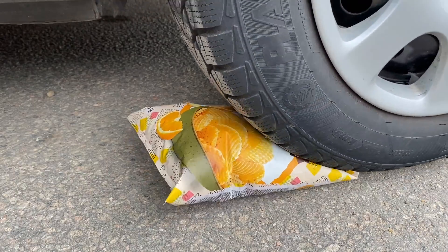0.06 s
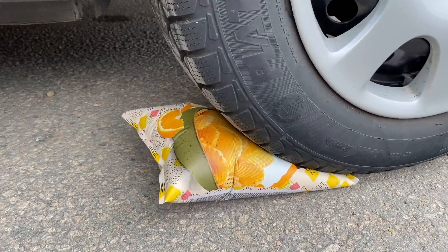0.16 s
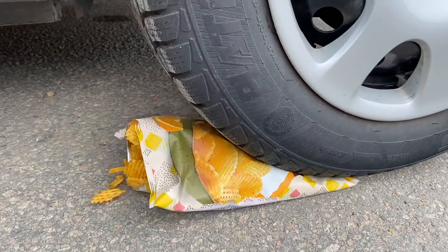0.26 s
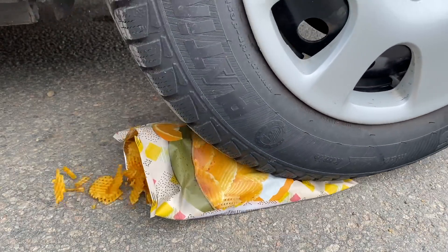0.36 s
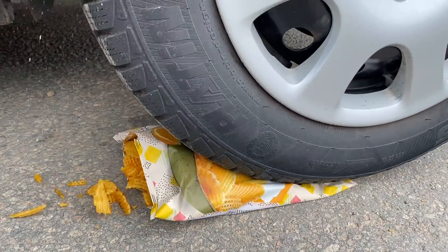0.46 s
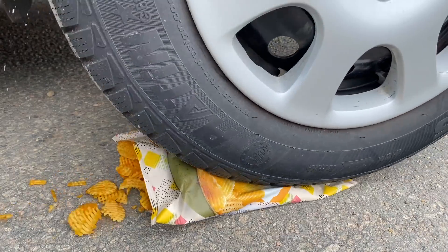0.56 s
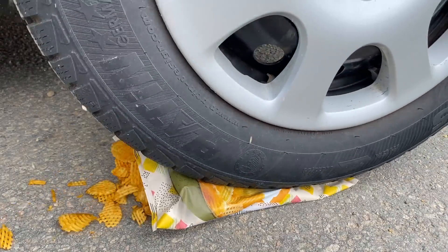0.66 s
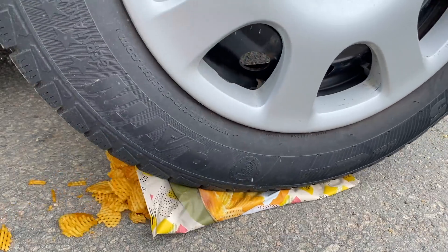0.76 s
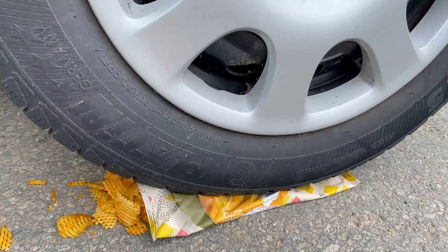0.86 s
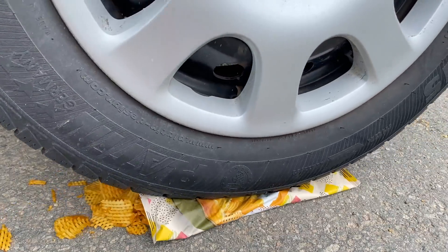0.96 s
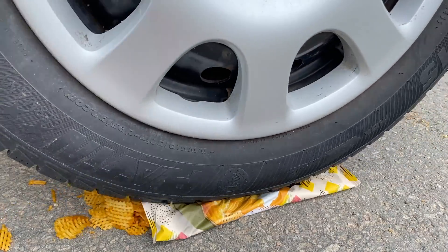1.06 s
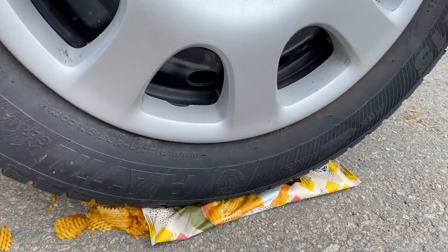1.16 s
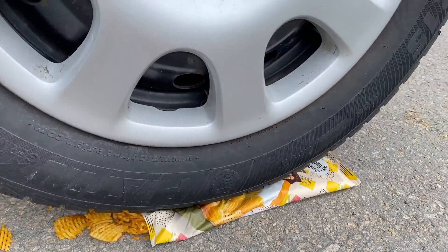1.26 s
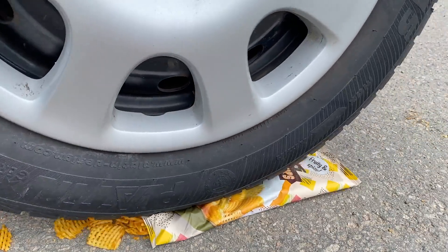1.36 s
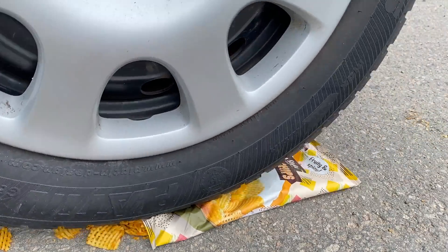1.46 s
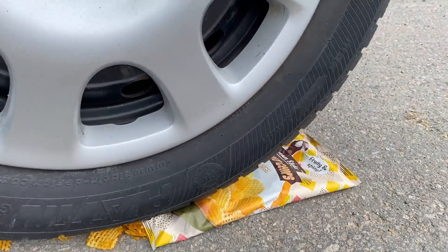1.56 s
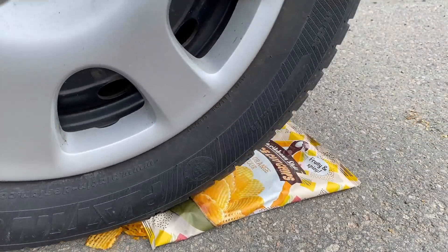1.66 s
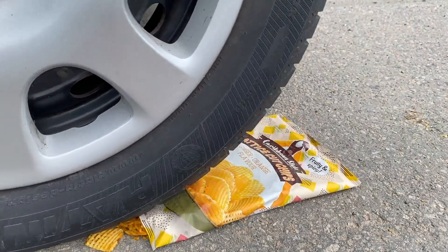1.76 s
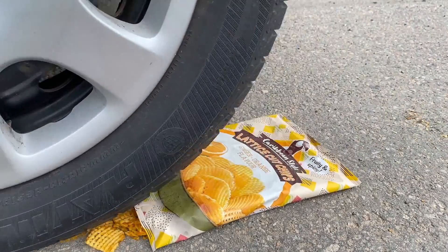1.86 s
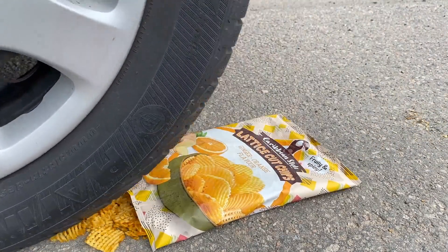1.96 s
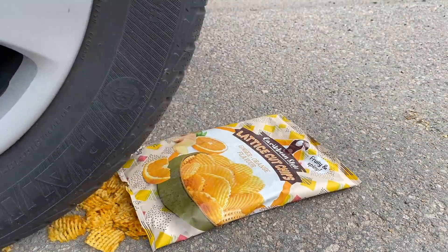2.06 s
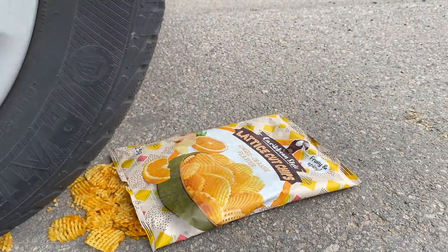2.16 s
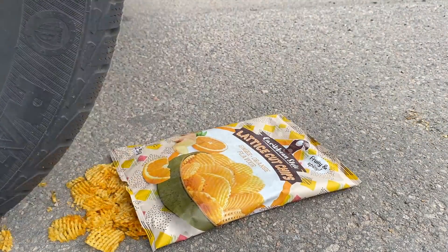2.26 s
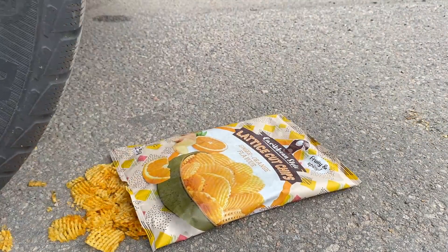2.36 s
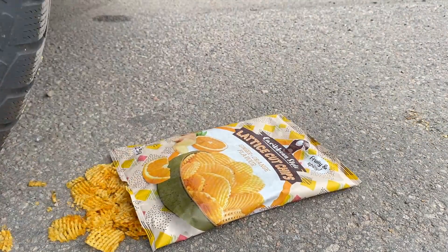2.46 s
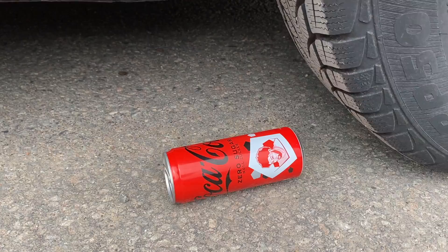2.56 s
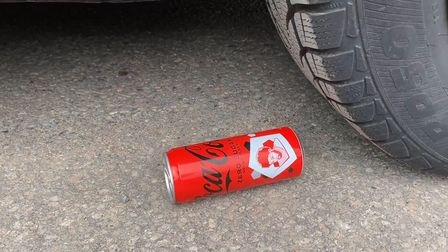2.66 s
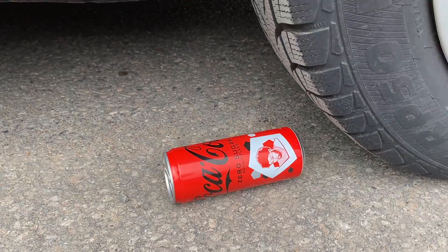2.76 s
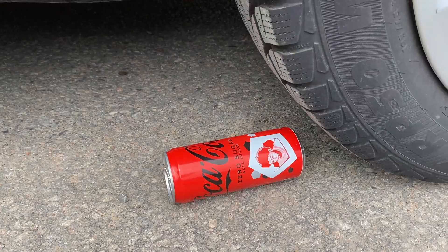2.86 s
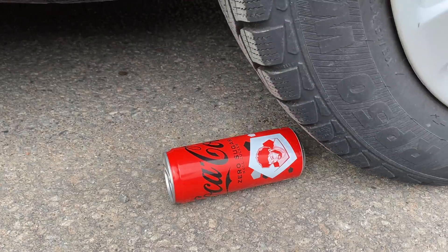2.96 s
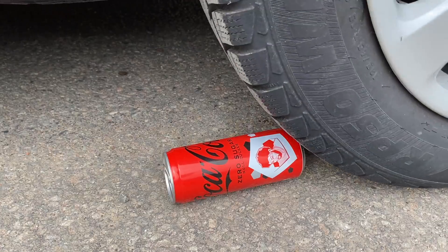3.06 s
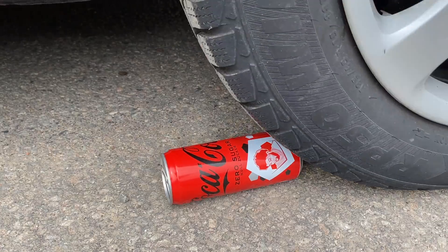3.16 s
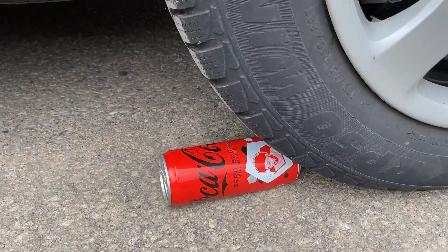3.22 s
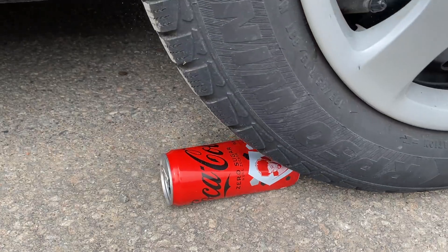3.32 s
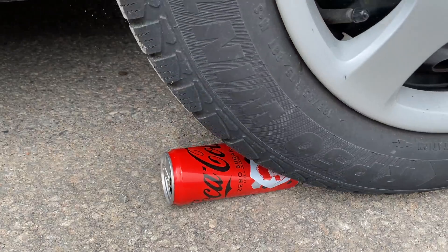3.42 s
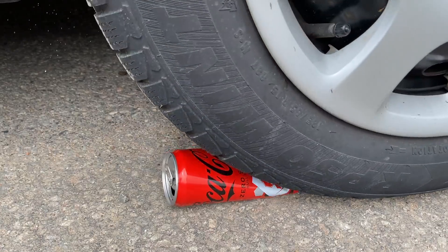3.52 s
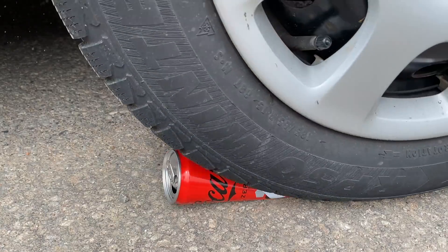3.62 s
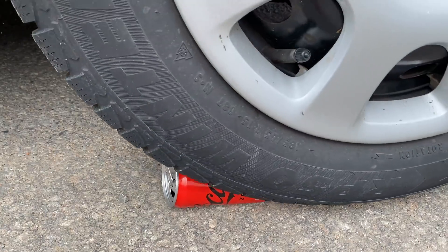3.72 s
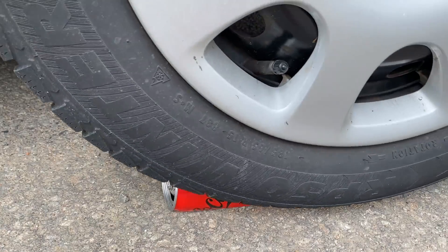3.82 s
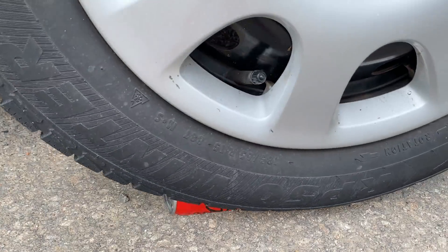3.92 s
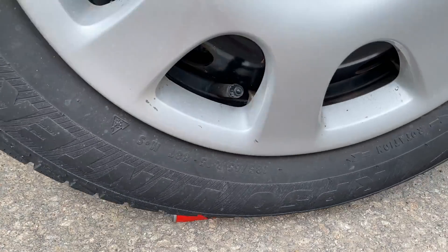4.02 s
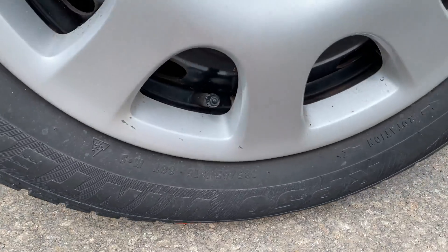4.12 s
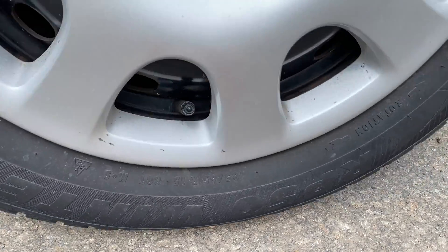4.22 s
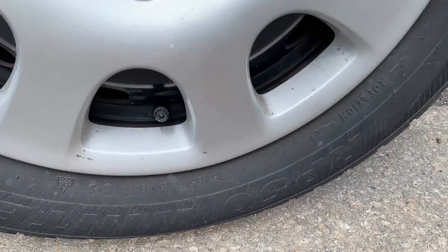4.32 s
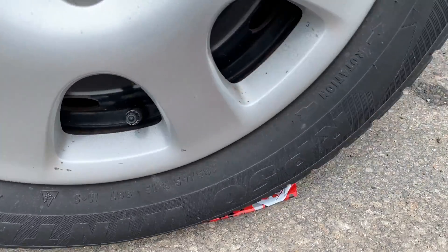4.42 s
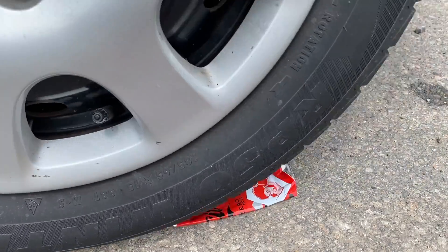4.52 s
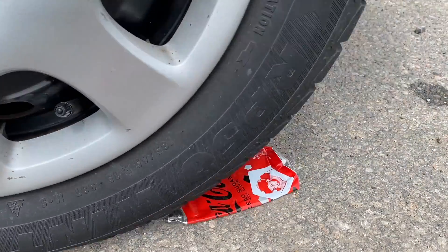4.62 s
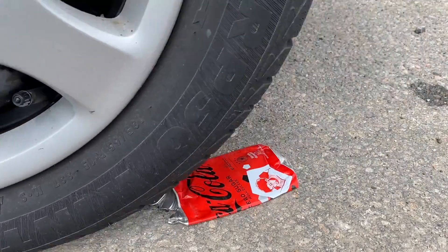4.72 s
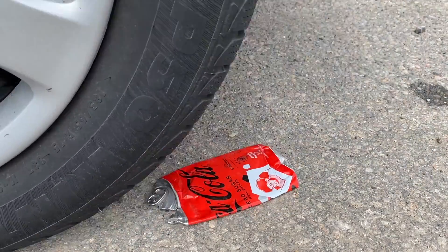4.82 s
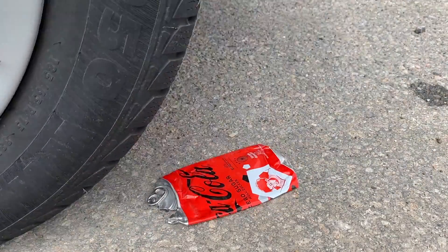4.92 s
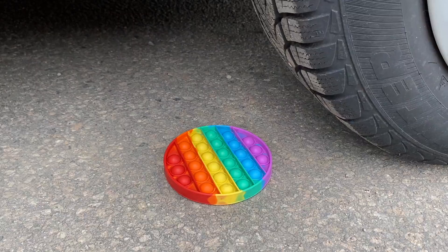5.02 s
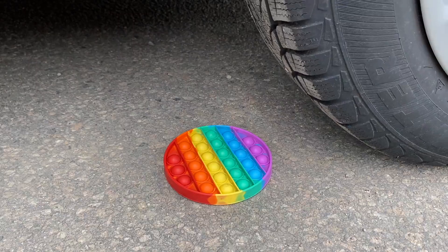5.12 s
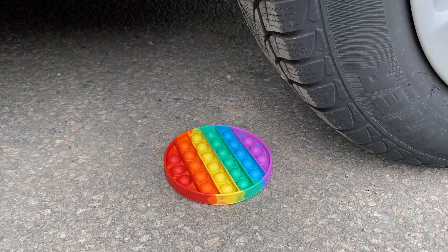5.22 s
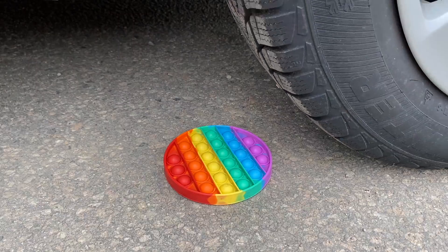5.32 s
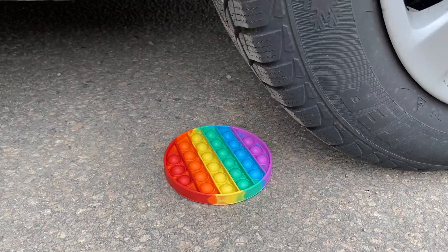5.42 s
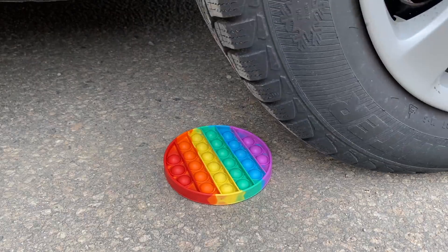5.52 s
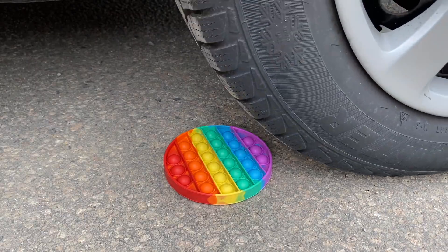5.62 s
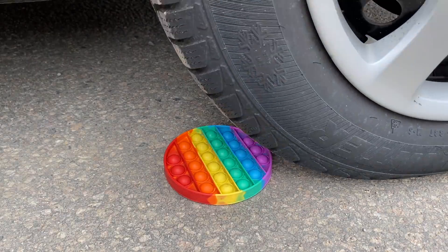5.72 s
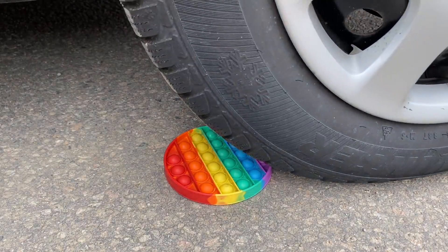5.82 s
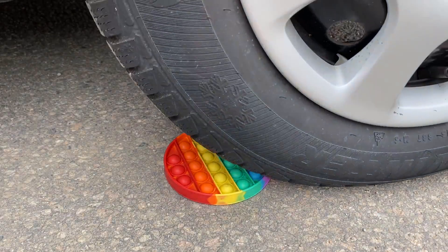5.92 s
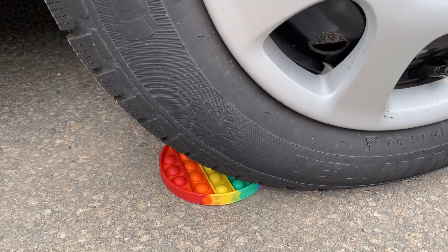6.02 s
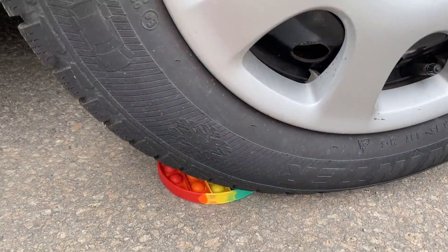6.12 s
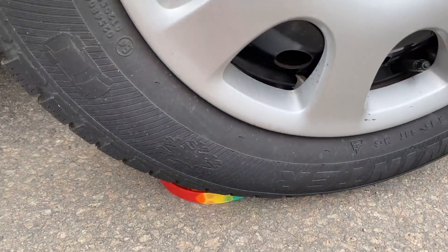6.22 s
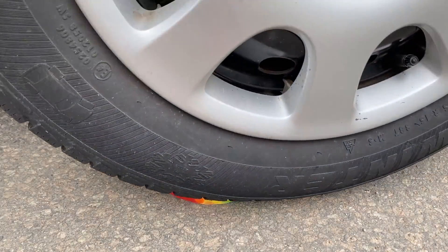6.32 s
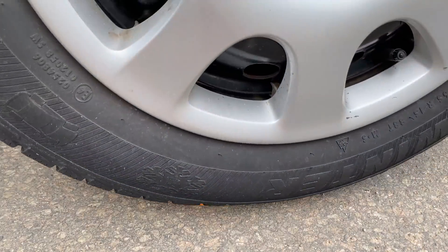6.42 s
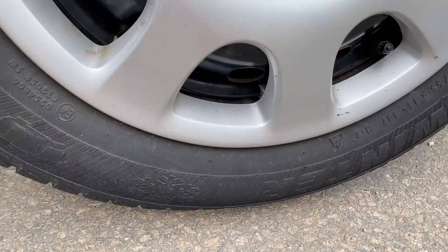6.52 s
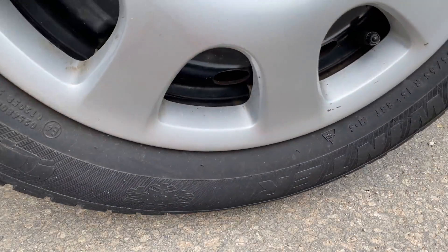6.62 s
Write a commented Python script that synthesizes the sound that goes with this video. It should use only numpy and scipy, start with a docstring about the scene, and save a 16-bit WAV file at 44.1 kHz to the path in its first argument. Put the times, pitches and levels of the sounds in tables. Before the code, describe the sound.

Close by an idling engine, brittle crunching ends in a sharp bag pop, thin metal crackles and buckles, then only quiet grit ticks remain.

```python
"""Crisps crunch and snap under a slowly rolling car tyre, and their bag bursts with a thump and a low puff.
Then the tyre buckles an empty drink can flat, and last it rolls onto a soft rubber toy with only ticks of grit.
The three shots are cut together. Breaks are short rings, noise and sharp cracks; the burst is a gliding tone.
Behind them an idling engine throbs in sine orders, with noise for its rumble, hiss and whines."""
import sys
import numpy as np
from scipy import signal
from scipy.fft import rfft, irfft, next_fast_len
from scipy.io import wavfile
from scipy.ndimage import uniform_filter1d, map_coordinates

SR = 44100
rng = np.random.default_rng(int(sys.argv[2]) if len(sys.argv) > 2 else 0)


def volts(x):
    """Linear amplitude factor 10**(x/20) for a level x in dB, scalar or array-like."""
    e = np.asarray(x, float) / 20
    return 10 ** e


def master(y):
    """Save y as 16-bit WAV."""
    cut = np.clip(np.atleast_2d(y).T, -1, 1)
    pcm = np.round(cut * 32767)  # scale
    wavfile.write(sys.argv[1], SR, pcm.astype(np.int16))


N = 294588  # length in samples


# steady crushing of crisps: (t/s, level/dB)
CRISP_CRUSH = [(0, -34.5), (.09, -21.5), (.19, -43), (.227, -31.5), (.231, -45), (.48, -24), (1.0, -24.5),
               (1.45, -31.5), (1.72, -30), (1.851, -36.5), (1.901, -53.5)]
# tone colour of dry crumbs: (f/Hz, relative level/dB)
CRUMB_COLOUR = [(150, -39.5), (300, -14.5), (650, -5.5), (1600, -7.5), (2200, -11), (4300, -12.5),
                (7500, -15.5), (16500, -25)]
# gain of the lower part of the crunch: (t/s, level/dB)
CRISP_BODY = [(0, 3.5), (1.6, 7), (1.87, -0.5)]
# single snaps of crisps: (t/s, level/dB, ring f/Hz, relative crack level/dB)
CRISP_SNAPS = [(.016, -16.5, 815, -12.5), (.029, -22, 1680, -10.5), (.038, -18, 1070, 2),
               (.054, -23, 970, -8), (.072, -16, 1538, -6.5), (.078, -10.5, 986, -7.5),
               (.099, -20, 1465, -14), (.108, -8, 1100, -8.5), (.114, -5, 635, -18),
               (.149, -13.5, 1570, -5), (.156, -10.5, 1040, -6), (.166, -13.5, 1040, -16),
               (.205, -10.5, 1192, -8), (.507, -11.5, 150, -24), (.61, -16.5, 1110, -8),
               (.813, -14.5, 1070, -8.5), (.989, -10, 1300, -12), (1.093, -16, 963, -7),
               (1.219, -18.5, 704, 17), (1.25, -11, 1085, 2), (1.751, -12, 890, -6), (1.848, -29, 870, 9),
               (1.861, -17.5, 2120, -12)]


def crisps():
    """Brittle pieces break in a dense crunch, with larger single snaps on top."""
    crunch = crushing(CRISP_CRUSH, CRUMB_COLOUR, rate=1100, spread_db=6, clump_db=0.14, cycles=0.61, bed=1.2)
    crunch = tilted(crunch, CRISP_BODY, split_hz=1300)
    return crunch + snaps(brittle(CRISP_SNAPS), CRUMB_COLOUR, [], rasp_db=-1.0, crack_db=-4.5)


def burst():
    """A falling thump as the seam tears; the flapping tone climbs, then slackens into a low puff."""
    tear_s, tighten_s, slack_s, sag_s = .2145, .006, .2258, .0033  # start, climb time, slackening, fall time
    flap_hz, tight_hz, puff_hz = 430, 928, 12
    flap_db, puff_rise_db, puff_t60_s, attack_s = -9, 3.5, .4, 0.0016
    thump_hz, thump_sag_s, thump_db, thump_t60_s = 483, .006, -3.5, .045  # start pitch, its fall, level, decay
    t = np.arange(N) / SR
    since = np.maximum(t - tear_s, 0)
    slack = np.maximum(t - slack_s, 0)
    onset = np.minimum(since / attack_s, 1)
    sag = np.exp(-slack / sag_s)
    climb = flap_hz * (tight_hz / flap_hz) ** np.minimum(since / tighten_s, 1)
    hz = puff_hz + (climb - puff_hz) * sag
    turn = 2 * np.pi * np.cumsum(hz * (since > 0)) / SR
    rough = 0.06 * (hz > 500) * rng.standard_normal(N)  # noise only while the pitch is high
    level_db = flap_db + puff_rise_db * (1 - sag) - 60 * slack / puff_t60_s
    flap = volts(level_db) * (np.sin(turn) + 0.045 * np.sin(3 * turn) + rough)
    thump_turn = 2 * np.pi * thump_hz * thump_sag_s * (1 - np.exp(-since / thump_sag_s))
    thump = volts(thump_db - 60 * since / thump_t60_s) * np.sin(thump_turn)
    return onset * (flap + thump)


# steady crushing of the can: (t/s, level/dB)
CAN_CRUSH = [(3.115, -43), (3.16, -34.5), (3.28, -28.5), (3.34, -60.5), (3.43, -34), (3.6, -19.5),
             (3.85, -22.5), (3.99, -25.5), (4.04, -26.5), (4.2, -27), (4.235, -40), (4.31, -15.5),
             (4.45, -30), (4.551, -50), (4.64, -34), (4.78, -63)]
# tone colour of thin sheet metal: (f/Hz, relative level/dB)
SHEET_COLOUR = [(120, -57.5), (250, 0.5), (550, 5.5), (1000, 4), (1500, 2.5), (4700, -5), (7500, -19),
                (16500, -31)]
# folds of the can wall: (t/s, level/dB, ring f/Hz, relative crack level/dB)
CAN_FOLDS = [(3.123, -18, 2163, -17), (3.144, -14.5, 2292, -6.5), (3.157, -9, 1388, 3),
             (3.166, -4, 372, -5), (3.176, -11.5, 3910, -0.5), (3.197, -11.5, 2443, 1.5),
             (3.225, -9, 669, 3.5), (3.251, -5.5, 2600, -0.5), (3.27, -6.5, 501.5, -1.5),
             (3.279, -12.5, 900, -25), (3.296, -16.5, 900, -30), (3.391, -36.5, 1880, 18),
             (3.414, -20, 1880, -9), (3.442, -4.5, 1092, -5.5), (3.464, -1.5, 1042, 6),
             (3.474, -2, 1014, 1), (3.523, -15.5, 1690, 11), (3.579, -1, 585, -4), (3.593, -11, 533, 2.5),
             (3.662, -6, 802, -15), (3.706, -3.5, 1995, 1.5), (3.716, -7.5, 900, -24), (3.747, 3.5, 847, 1),
             (3.761, -1.5, 719, -3.5), (3.797, 3, 1015, -4), (3.825, -0.5, 593, -11),
             (3.844, -8.5, 652, 8.5), (3.849, 0.5, 678, -25), (3.867, 4, 997, 0), (3.892, 3, 990, -3.5),
             (3.937, 3, 825, -6), (3.949, -6, 974, -22.5), (3.965, 5, 1934, -4), (3.998, -7, 1623, 0.5),
             (4.008, -4.5, 900, -7), (4.065, -2.5, 1500, -11), (4.122, -8, 1420, -5),
             (4.149, -15.5, 1600, 4.5), (4.164, 1.5, 1482, -19), (4.177, -4, 1662, 4),
             (4.241, 3, 1490, -21.5), (4.265, -6, 1386, -1), (4.284, -5, 1700, 2.5),
             (4.296, -14, 2680, -8.5), (4.302, -1, 1820, 1.5), (4.315, -5.5, 2900, -10),
             (4.328, -2, 1830, -7.5), (4.35, -0.5, 1980, -4.5), (4.372, -4, 1070, -23),
             (4.385, -8, 1910, -3.5), (4.401, -15, 1115, -12), (4.433, -8.5, 1003, -17.5),
             (4.468, -9.5, 1870, -12.5), (4.482, -3.5, 1498, -14.5), (4.578, -6.5, 1353, -2.5),
             (4.62, -22, 1370, -25), (4.649, -24.5, 1573, -17)]
# how long the wall rings at 1 kHz while the tread damps it: (t/s, t60/s)
WALL_RINGING = [(3.6, 0.084), (3.72, 0.049), (3.9, 0.047), (4.02, 0.022), (4.25, 0.011), (4.35, .02),
                (4.5, 0.057), (4.6, .07)]
# the can ringing as a whole, before chance changes: (f/Hz, relative level/dB, longest t60/s)
SHELL_MODES = [(386, -19, 0.081), (900, -20.5, 0.076), (1430, -20.5, 0.05), (1970, -7, 0.023)]
# gain of the can's low body, lost while it lies flat: (t/s, level/dB)
HOLLOW_BODY = [(3.99, 0), (4.04, -11), (4.235, -28), (4.55, -17.5), (4.63, -4)]


def can():
    """Folds of thin metal ring briefly, higher ones dying sooner; the flatter the can, the less low body."""
    rise_cycles = 1.145  # a fold gives way in about this many cycles of its ring
    pitch_damping = 0.41  # t60 falls as (Hz / 1000) to this power
    folds = []
    for s, db, hz, crack_db in CAN_FOLDS:
        t60 = np.interp(s, *np.transpose(WALL_RINGING)) * (hz / 1000) ** -pitch_damping
        folds.append((s, db, hz, crack_db, t60, rise_cycles / hz))
    metal = crushing(CAN_CRUSH, SHEET_COLOUR, rate=1000, spread_db=4.0, clump_db=4.5, cycles=3, bed=0.79)
    metal += snaps(folds, SHEET_COLOUR, SHELL_MODES, rasp_db=-3.5, crack_db=-1.0)
    return tilted(metal, HOLLOW_BODY, split_hz=786)


# ticks of grit: (t/s, level/dB, ring f/Hz, relative crack level/dB)
GRIT_TICKS = [(5.336, -33.5, 1250, 0), (5.622, -26, 1510, 4.5), (5.973, -28, 1040, -21),
              (6.234, -28.5, 1470, -27), (6.438, -31.5, 815, -18), (6.657, -27.5, 1000, -32),
              (6.667, -35.5, 1430, -15.5)]


def grit():
    """Small hard bits tick under the tyre like quiet, dry snaps."""
    return snaps(brittle(GRIT_TICKS), CRUMB_COLOUR, [], rasp_db=-7.5, crack_db=-11)


def brittle(rows):
    """Dry pieces all die equally fast: adds a t60 and a rise time in s to each row."""
    return [(*row, .014, .0008) for row in rows]


def crushing(rows, colour, rate, spread_db, clump_db, cycles, bed):
    """Dense small fractures, each a brief ring at its own pitch, clumped in time over a bed of finer ones."""
    t, life = np.arange(N) / SR, np.arange(160) / SR
    start, end = rows[0][0], rows[-1][0]
    on = (t >= start) & (t <= end)
    when, pitch, size, sign = rng.random((int(rate * (end - start)), 4)).T  # rate: fractures per second
    hz = 500 * 24 ** pitch[:, None]
    gain = volts(-spread_db * np.log(size * .98 + .02)) * np.sign(sign - .5)  # few large, many small
    decay = np.exp(-life * hz / cycles)
    ring = gain[:, None] * np.sqrt(hz) * np.sin(2 * np.pi * hz * life) * decay
    at = ((start + when * (end - start)) * SR).astype(int)[:, None] + np.arange(len(life))
    grains = np.bincount(at.ravel(), ring.ravel(), N)[:N]
    grains = filtered(grains, lambda f: np.sqrt(f))  # as many grains in each octave: level them per Hz
    fine_bed = bed * rng.standard_normal(N)
    mix = volts(clump_db * wobble(70)) * (grains / grains[on].std() + fine_bed)
    x = signal.fftconvolve(mix, causal(colour))[:N]
    return on * volts(curves(rows)[0]) * x / x[on].std()


def panel_ring(t, hz, t60, rise, body):
    """A quick run of slips sets off a strong panel tone, five weaker neighbours and the body modes."""
    swell = (t + 0.0006) / rise * np.exp(-t / rise)
    slips = (swell * rng.standard_normal(len(t)) * (rng.random(len(t)) < .15))[:1024]
    pitch = hz * np.exp(np.r_[0, rng.normal(.15, .5, 5)])[:, None]
    strength = volts(np.r_[0, rng.normal(-10, 3, 5)])[:, None]
    decay = volts(-60 * t / t60 * np.sqrt(pitch / hz))
    ring = np.sum(strength * np.sin(2 * np.pi * pitch * t) * decay, 0)
    for mode_hz, mode_db, mode_t60 in body:  # the dented shell is a little detuned at every fold
        bent_hz = mode_hz * rng.normal(1, 0.052)
        level_db = mode_db + rng.normal(0, 4.0) - 60 * t / min(mode_t60, 1.4 * t60)
        ring += volts(level_db) * np.sin(2 * np.pi * bent_hz * t)
    return signal.fftconvolve(ring, slips)[:len(t)]


def snaps(rows, colour, body, rasp_db, crack_db):
    """Each break adds up a ring set off by slips, a rasp of coloured noise and a bright crack."""
    out, t, shade = np.zeros(N + SR), np.arange(4096) / SR, causal(colour)[:256]

    def peak(v):
        """Scaled so that its loudest 70 samples have the rms of a sine of peak 1."""
        return v / np.sqrt(2 * abs(uniform_filter1d(v ** 2, size=70)).max())

    for s, db, hz, bright_db, t60, rise in rows:
        t60, rise = max(t60, .004), max(rise, .0002)
        ring = panel_ring(t, hz, t60, rise, body)
        fade = np.minimum(1, (t + 0.0012) / rise) * volts(-60 * np.maximum(t - rise, 0) / (0.92 * t60))
        rasp = signal.fftconvolve(rng.standard_normal(len(t)) * fade, shade)[:len(t)]
        spike = 1 + 2.0 * np.exp(-((t - rise) / 0.00042) ** 2)  # the crack is sharpest as the piece gives way
        crack = signal.fftconvolve(rng.standard_normal(len(t)) * fade * spike, shade)[:len(t) + 2]
        crack = np.diff(crack, 2)  # differencing twice brightens it
        blow = peak(peak(ring) + volts(rasp_db) * peak(rasp))
        blow += volts(crack_db + bright_db) * peak(crack)
        out[round(s * SR):][:len(t)] += volts(db) * blow
    return out[:N]


# how long road and car floor answer: (f/Hz, t60/s)
GROUND_ANSWER = [(200, 0.048), (2000, 0.045), (10000, 0.0081)]


def near(x, left_db, lag_s, wet_db):
    """A source by the tyre: direct sound and a short echo that differs at each ear and keeps changing."""
    hop, wet = 1024, np.zeros((2, N + SR))
    bright = filtered(x, lambda f: (f / 2500) ** .35)  # the echo is brighter than the direct sound
    bright = np.pad(bright, (0, 2 * hop))
    hz, t, z = signal.stft(rng.standard_normal((12, 2, 2048)), SR, nperseg=128)
    decay = volts(-60 * t / along(GROUND_ANSWER, hz)[:, None])
    tails = signal.istft(z * decay, SR, nperseg=128)[1]
    for k, at in enumerate(range(0, N, hop)):  # twelve echoes take turns
        tail = tails[k % len(tails)]
        piece = bright[None, at:at + 2 * hop] * np.hanning(2 * hop)
        answer = signal.fftconvolve(piece, tail / np.linalg.norm(tail[0]), axes=1)
        wet[:, at:at + answer.shape[1]] += answer
    direct = filtered(x, lambda f: np.exp(-2j * np.pi * f * np.array([[0], [lag_s]])))
    return direct * volts(np.array([[left_db], [-left_db]]) / 2) + volts(wet_db) * wet[:, :N]


# starts of the three shots: (t/s)
SHOT_STARTS = [0, 2.594, 5.027]
# each shot before fixed boosts: (hiss level/dB, its fade in dB/s, rumble level/dB, its fade in dB/s)
SHOT_LEVELS = [(-34.5, 5, -42.5, 1.5), (-41, 2, -33.5, -0.7), (-40.5, 1.35, -42.5, -2.1)]


def engine():
    """Throb, rumble and hiss of the idling engine, at each shot's own level."""
    t = np.arange(N) / SR
    shot = np.searchsorted(SHOT_STARTS, t, "right") - 1
    since = t - np.take(SHOT_STARTS, shot)
    hiss_db, hiss_fade, rumble_db, rumble_fade = np.array(SHOT_LEVELS)[shot].T
    tone, turn = idle_throb(shot)
    low = rumble(rumble_db - rumble_fade * since)
    return tone * volts([[.3], [-.3]]) + low + hiss(hiss_db - hiss_fade * since, turn)


# strongest order of the throb, one list for each shot: (t/s, f/Hz, level/dB)
THROB_TRACKS = [
    [(0, 74, -32), (.225, 72, -31), (.5, 73.3, -33), (2.59, 73.3, -30.5)],
    [(2.6, 69.4, -29.5), (2.85, 68.8, -26), (3.12, 74.8, -21.5), (3.32, 76.2, -30), (3.77, 76.4, -22.5),
     (4.07, 73.7, -31), (4.82, 78.7, -29), (5.02, 68, -24.5)],
    [(5.03, 69, -33), (5.25, 70, -48), (5.5, 72, -34.5), (5.63, 71, -45.5), (5.83, 72, -26.5),
     (6.05, 77.5, -26.5), (6.4, 77.5, -32), (6.6, 76, -32), (6.68, 71, -34)],
]
# weaker orders: (multiple of the lowest order, level/dB relative to the strongest)
WEAK_ORDERS = [(1, -17.5), (2, -16), (4, -16), (5, -22), (6, -27), (7.5, -20.5)]


def idle_throb(shot):
    """Sine orders locked to one slightly unsteady turning; also returns that turning as a phase."""
    hz, tone_db = sum(curves(rows) * (shot == k) for k, rows in enumerate(THROB_TRACKS))
    turn = 2 * np.pi * np.cumsum(hz / 3 * (1 + .012 * wobble(9))) / SR  # the strongest order is the third
    orders = volts(1.2 * wobble(12)) * np.sin(3 * turn)
    for k, db in WEAK_ORDERS:
        orders += volts(db + 3.8 * wobble(3.5)) * np.sin(k * turn + rng.uniform(0, 2 * np.pi))
    return np.sqrt(2) * volts(tone_db) * orders, turn


# tone colour of the rumble: (f/Hz, relative level per Hz/dB)
RUMBLE_COLOUR = [(12, -38), (20, -5.5), (37, -7), (60, 4.5), (83, -3.5), (140, -9.5), (180, -32.5),
                 (310, -120)]
# passing swells of the rumble: (t/s, level/dB, half width/s)
RUMBLE_SWELLS = [(.515, 13, .015), (.9, 7.5, .6), (2.85, 6.5, .08), (5.42, 8, 0.16), (6.47, 14, 0.076),
                 (6.6, 10, .04)]


def rumble(level_db):
    """Unsteady low noise, nearly alike at both microphones, that swells in passing."""
    t = np.arange(N) / SR
    swell_db = sum(db * np.exp(-((t - s) / width) ** 2) for s, db, width in RUMBLE_SWELLS)
    noise = pair(RUMBLE_COLOUR, .0003, [(30, 0.91), (140, 0.84)])
    return volts(level_db + swell_db + 1.5 + 2.2 * wobble(19)) * noise


# tone colour of the hiss: (f/Hz, relative level per Hz/dB)
HISS_COLOUR = [(60, -25), (100, -8), (190, -5.5), (800, -13.5), (1640, -19), (2800, -23.5), (3500, -25),
               (7000, -37), (16500, -41)]


def hiss(level_db, turn):
    """Wide noise and whines of the engine bay, pulsing with the lowest order of the throb."""
    pulse = volts(1.4 * np.sin(turn) + 1.1 * wobble(20))
    noise = pair(HISS_COLOUR, 0.00041, [(150, .8), (1000, 0.38), (3000, 0.38), (8000, 0.052)])
    return volts(level_db + 5) * pulse * (noise + whines())


# whines of the engine bay: (f/Hz, width/Hz, level/dB relative to the hiss)
BAY_WHINES = [(248.4, 42, -14.5), (760, 78, -14), (2290, 50, -26.5), (2850, 86, -28.5)]
# the highest whine comes forward once: (t/s, level/dB, half width/s)
WHINE_SWELL = (5.9, 12, 0.28)


def whines():
    """Fuzzy tones of belts and pumps, made of narrow noise, that come and go."""
    tones = []
    for hz, width, db in BAY_WHINES:
        narrow = filtered(rng.standard_normal(N), lambda f: 1 / (1 + ((f - hz) / width * 2) ** 2))
        tones.append(volts(db + 2.9 * wobble(2.966)) * unit(narrow))
    s, swell_db, half_width = WHINE_SWELL
    forward = volts(swell_db * np.exp(-((np.arange(N) / SR - s) / half_width) ** 2))
    mix = sum(tones[:-1]) + tones[-1] * forward
    return np.array([mix, np.roll(mix, 19)])  # the right microphone hears them 19 samples late


def pair(spectrum, lag_s, alike):
    """Stereo noise of rms 1; the shared part reaches the right microphone late."""
    shared, left, right = rng.standard_normal((3, N))

    def colour(hz):
        return volts(along(spectrum, hz))

    def own(hz):
        return np.sqrt(1 - np.clip(along(alike, hz), 0, 1))

    def late(hz):
        return np.exp(-2j * np.pi * hz * np.array([[0], [lag_s]]))

    common = filtered(shared, lambda hz: colour(hz) * late(hz) * np.sqrt(1 - own(hz) ** 2))
    separate = filtered(np.array([left, right]), lambda hz: colour(hz) * own(hz))
    return unit(common + separate)


def tilted(x, rows, split_hz):
    """The part of x below the split follows the (t/s, level/dB) rows."""
    low = filtered(x, lambda hz: 1 / (1 + (hz / split_hz) ** 4))
    return x + (volts(curves(rows)[0]) - 1) * low


def causal(spectrum):
    """Minimum-phase impulse response of a (f/Hz, level/dB) colour: it starts as sharply as it can."""
    cep = irfft(np.log(volts(along(spectrum, np.fft.rfftfreq(2048, 1 / SR))) + 1e-6))
    cep[1:1024] *= 2  # fold the cepstrum onto positive times
    cep[1025:] = 0
    return irfft(np.exp(rfft(cep)))[:1024]


def filtered(x, response):
    """x times a complex response of frequency."""
    m = next_fast_len(N + 8192)
    return irfft(rfft(x, m) * response(np.fft.rfftfreq(m, 1 / SR)), m)[..., :N]


def unit(x):
    """Scaled to rms 1."""
    return x / np.sqrt(np.mean(x ** 2) + 1e-20)


def along(points, hz):
    """Reads (f/Hz, value) points on a log frequency axis."""
    f, v = np.transpose(points)
    return np.interp(np.log(hz + 1), np.log(f + 1), v)


def curves(rows):
    """One value per sample for each column after the time."""
    s, *cols = np.transpose(rows)
    return np.array([np.interp(np.arange(N) / SR, s, c) for c in cols])


def wobble(rate):
    """A smooth random curve, rate knots a second."""
    return map_coordinates(rng.standard_normal(int(N * rate / SR) + 4), [np.arange(N) * rate / SR])


def scene():
    """Bag, can and grit by the tyre over the engine."""
    dry_pieces = crisps() + grit() + burst()
    return engine() + near(dry_pieces, 3, .00006, -5) + near(can(), 1.8, .000025, -7.5)


# drops of the whole level after loud bangs: (t/s, lasting drop/dB, extra brief drop/dB, recovery/s)
LEVEL_DROPS = [(.233, 19, 11, 0.2), (3.293, 9.5, 3, 0.17)]


def level_drops():
    """Gain in dB: a fast fall, a partial recovery, whole again at the next shot."""
    attack_s = 0.0074
    t, total_db = np.arange(N) / SR, np.zeros(N)
    for s, lasting_db, brief_db, recovery in LEVEL_DROPS:
        since = np.maximum(t - s, 0)
        until = min(cut for cut in SHOT_STARTS if cut > s)
        depth_db = lasting_db + brief_db * np.exp(-(since / recovery) ** 2)
        total_db -= (t < until) * depth_db * (1 - np.exp(-since / attack_s))
    return total_db


# the treble, with two dips: (f/Hz, level/dB)
TREBLE_GAIN = [(7600, -0.5), (8300, -3.5), (9000, -24), (10000, -5), (11800, -7), (13200, -24),
               (14500, -13), (15500, -12.5), (16500, -27)]


def treble_dips(x):
    """A fixed filter dulls the treble and cuts two dips in it."""
    return filtered(x, lambda hz: volts(along(TREBLE_GAIN, hz)))


def top_cut(x):
    """Nothing passes above the cut-off."""
    return signal.sosfilt(signal.butter(12, 16810, fs=SR, output="sos"), x)


def record(dry):
    """The level drops after the bangs, the treble dips, and the recorder rounds off the highest peaks."""
    heard = treble_dips(dry * volts(level_drops()))
    top = .95  # full scale is 1
    rounded = heard / (1 + abs(heard / top) ** 5) ** (1 / 5)
    return top_cut(rounded)


dry = scene()
out = record(dry)
master(out)
```